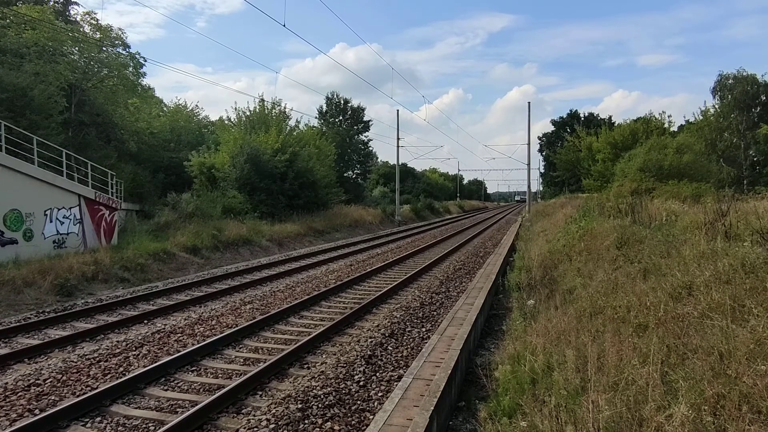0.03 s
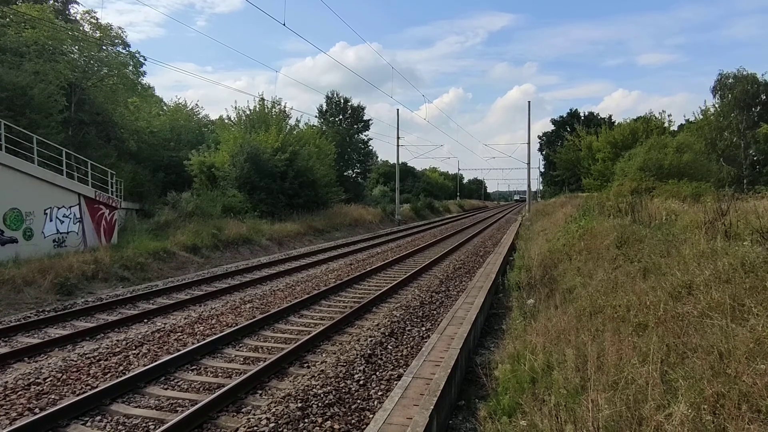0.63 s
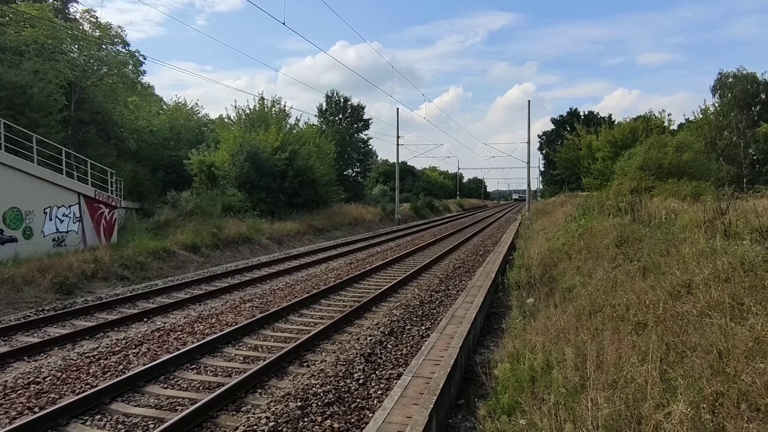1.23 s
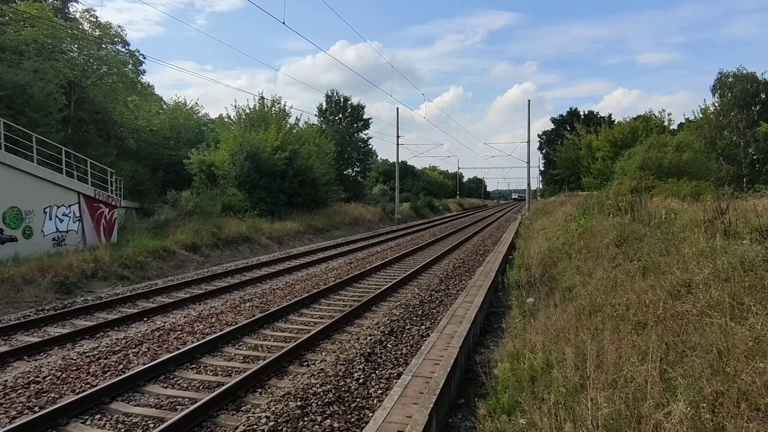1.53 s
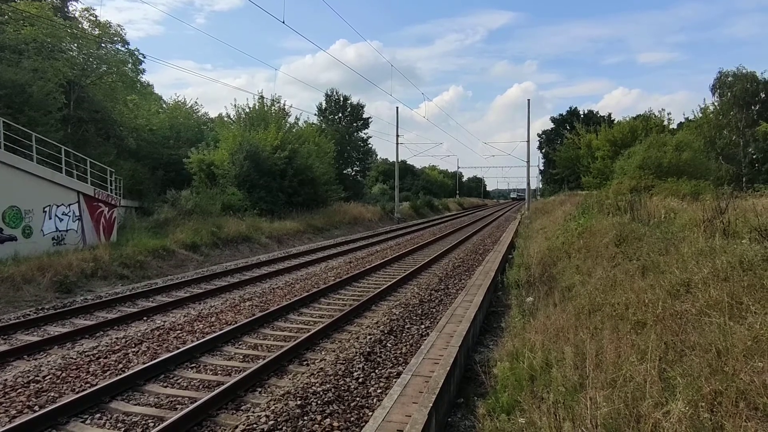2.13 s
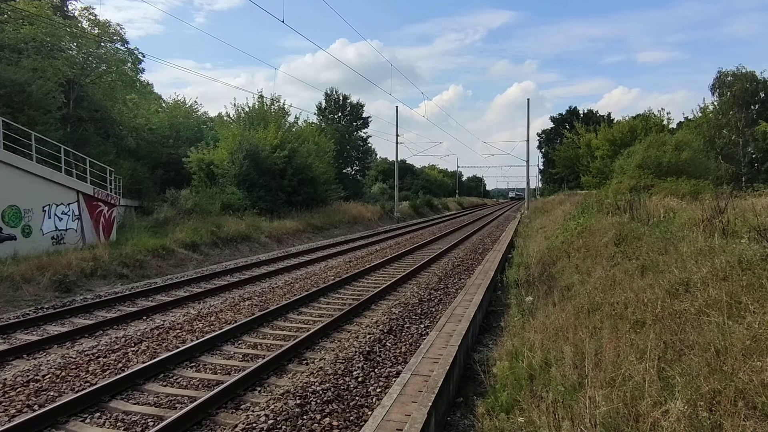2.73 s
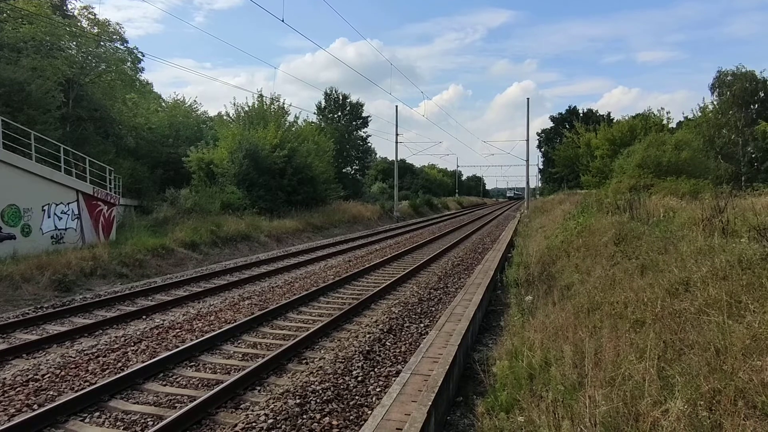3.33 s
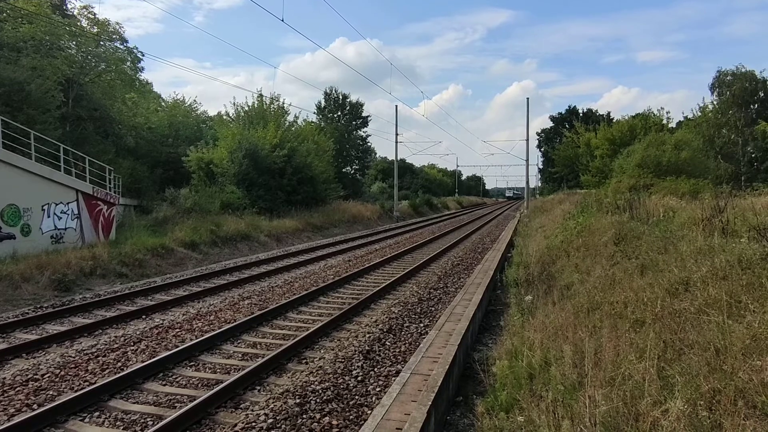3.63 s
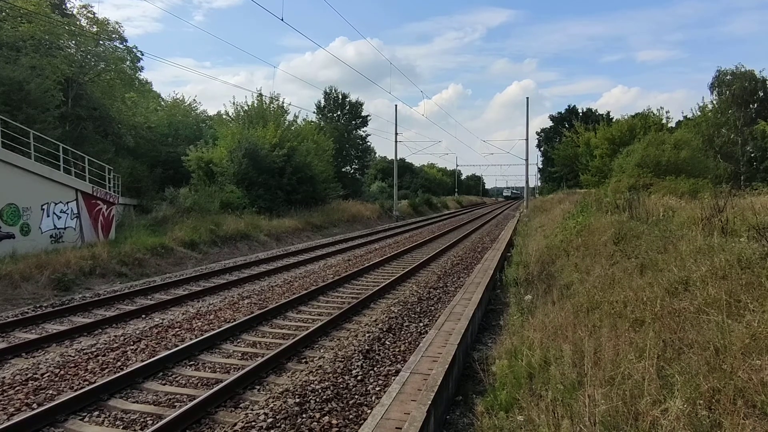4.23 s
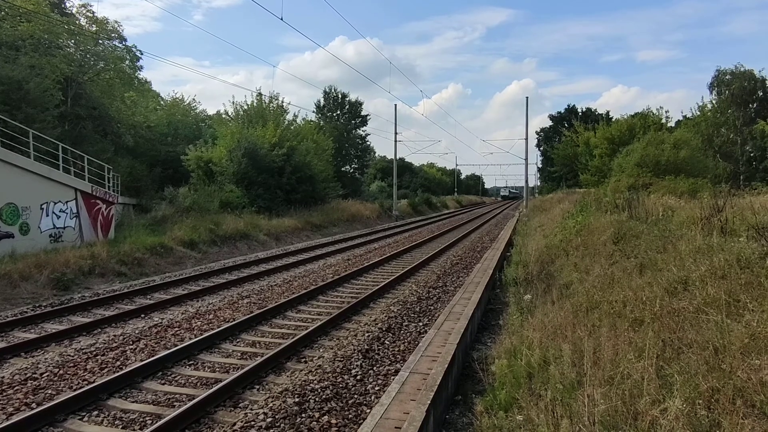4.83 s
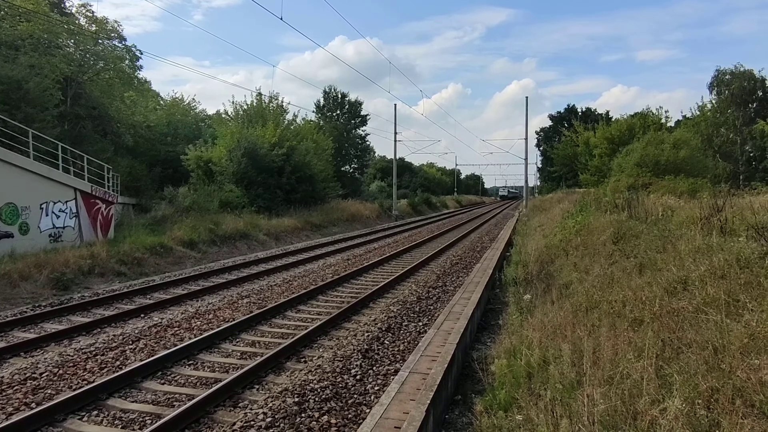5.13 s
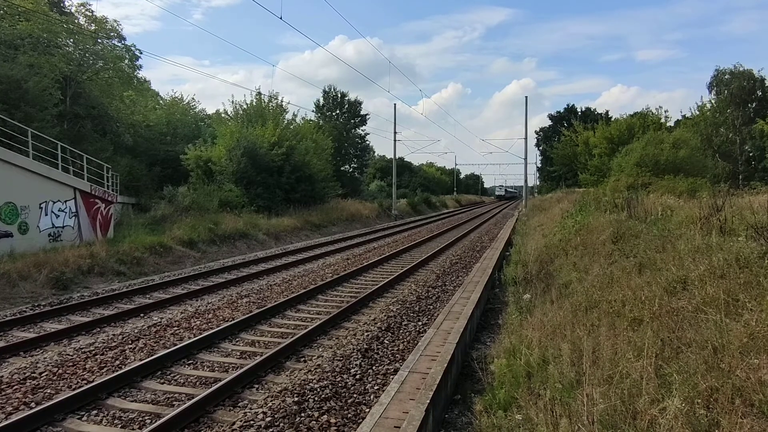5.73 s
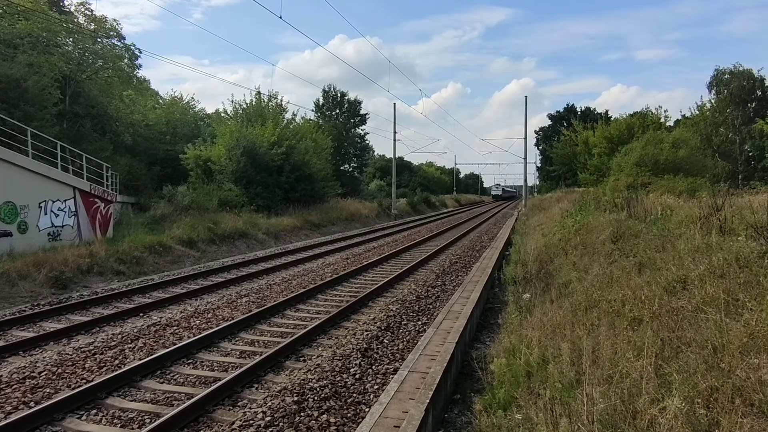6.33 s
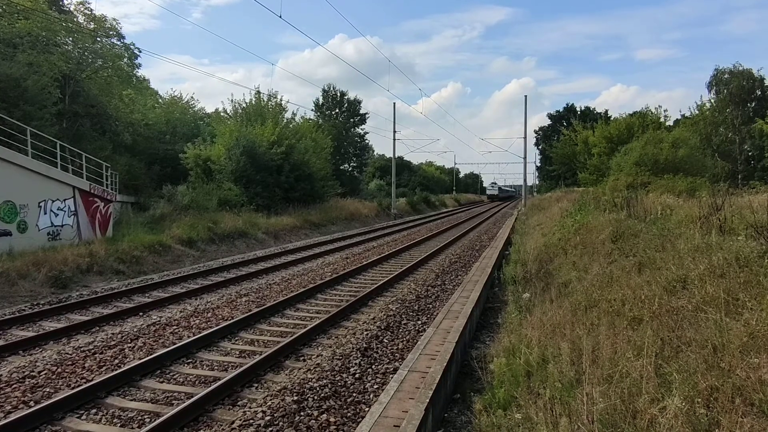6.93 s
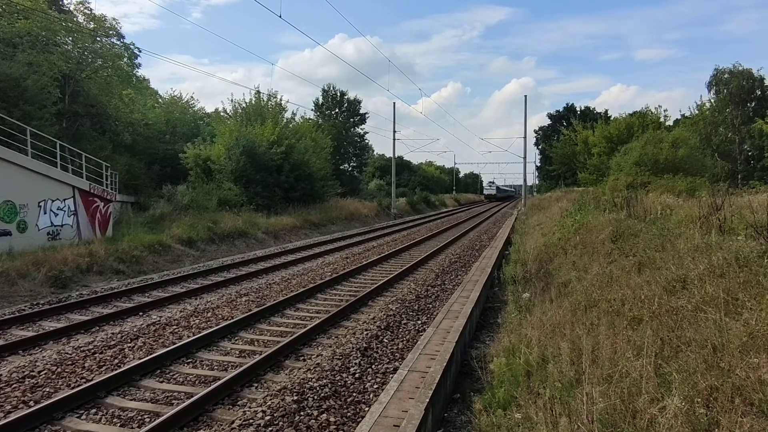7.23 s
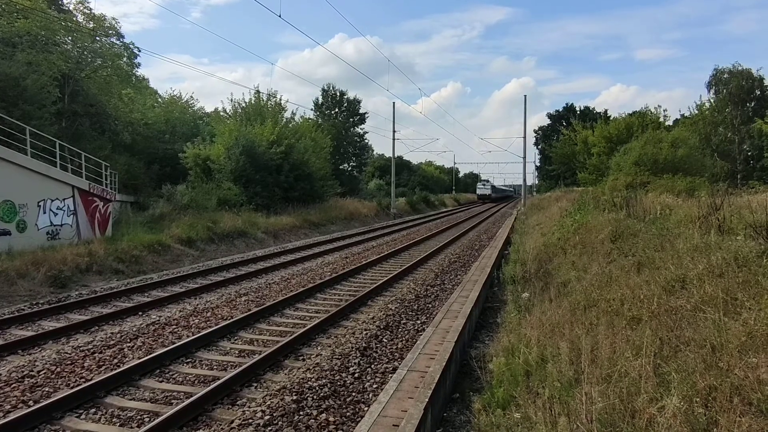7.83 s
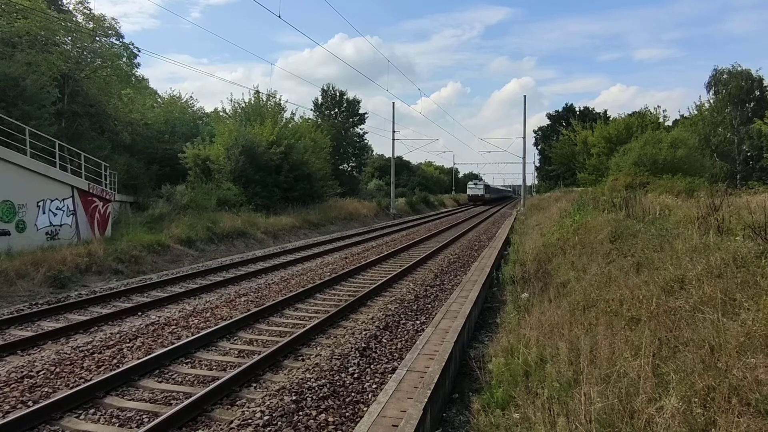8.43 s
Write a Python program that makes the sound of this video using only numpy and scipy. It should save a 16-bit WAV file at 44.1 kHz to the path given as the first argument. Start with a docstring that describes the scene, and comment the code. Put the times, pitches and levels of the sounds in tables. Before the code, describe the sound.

Steel rails sing with a ringing hiss and low rumble, growing steadily louder as a distant train approaches.

```python
"""Beside open track, a stereo microphone near the rails, a train still far off. At first the air is still,
with faint bird chirps and two rising hums. The rails carry the rolling noise ahead of the train: rough
wheel treads repeat at every turn and set the steel singing in many bands, while flat spots knock softly.
The singing eases near 2.5 s and swells near 3.5 s. Near 6 s the low drone under it blooms once,
and rails, drone and ground rumble go on growing to the end as the train draws closer."""
import sys
import numpy as np
from scipy import signal
from scipy.fft import rfft, irfft
from scipy.io import wavfile
from scipy.ndimage import uniform_filter1d, map_coordinates

SR = 44100
rng = np.random.default_rng(int(sys.argv[2]) if len(sys.argv) > 2 else 0)


def waveform_to_disk(signal):
    """Save audio, clipped to [-1, 1], as 16-bit WAV at the path in sys.argv[1]."""
    frames = np.transpose(np.atleast_2d(signal))
    scaled = np.clip(frames, -1, 1) * 32767
    samples = np.round(scaled).astype(np.int16)
    wavfile.write(sys.argv[1], SR, samples)


N = 374850
TIME = np.arange(N) / SR
FRAME, OVERLAP = 4096, 3072  # samples


# Bands in which the rails sing. Each row: centre in Hz, nominal width in Hz, base level in dB per Hz,
# dB gained per dB of approach, left over right in dB, left lead in radians, left-right likeness 0-1.
RAIL_BANDS = [(260, 147, -78, 2.5, 0, -1.6, 1), (390.6, 88, -62.5, 1.73, -3.5, 0, 0.91),
              (438, 82, -61, 1.5, -10.5, 1.0, 1.0), (475, 31, -64.5, 0.9, 10.5, 0.5, 0.95),
              (590.7, 89, -57, 1.2, 6, 1.13, 0.4), (658.8, 84, -51.5, 0.86, 0.5, 0.5, 1),
              (722, 53.4, -46.5, 1.0, 0, 0.6, 0.97), (768, 45, -50.5, 0.9, -4.5, 0.4, 0.95),
              (868, 140, -57, 0.7, -2.5, 1.63, 1), (972, 200, -59, 0.66, -7, 0.84, 0.95),
              (1098, 86, -67.5, 0.7, -15.5, -3.5, 0.8), (1190, 32, -65, 0.9, -9.5, 4, 0.2),
              (1256.5, 99, -60, 0.63, -4.5, -2.5, 0.95), (1309.3, 69, -62.5, 0.61, 6, -3, 0.34),
              (1635, 304, -72.5, 0.8, -1.7, 3, 0.35), (1850, 275, -68, 1.48, -7, -0.74, 0.49),
              (2182, 510, -72, 2.5, -0.5, -1.2, 0.4), (2330, 500, -82.5, 0.56, -2.5, 0.7, 0.08),
              (2834, 510, -83.5, 2, 0, -1.6, 0.7), (3490, 1700, -91.5, 1.9, -1.5, -2.5, 0.28),
              (4610, 2500, -99.5, 1.57, -17, 0.5, 0.4), (5510, 130, -88.5, 1.7, -9, 2.9, 0.6),
              (5634, 220, -87.5, 1.5, -10, 2, 0.55), (6410, 500, -90.5, 2, -3.5, 0.1, 0.6),
              (6748, 350, -83.5, 0.9, 12, 1.3, 0.56), (7400, 4500, -106.1, 3, 21, -3, 0.09),
              (9300, 390, -105, 1.5, 9, -3.5, 0.3), (9500, 1900, -103.3, 0.9, 9, -2.5, 0.19),
              (12440, 2800, -102.8, 0.8, -6, -3.5, 0.2), (12500, 900, -106, 0.5, -6, -3, 0.2),
              (14084, 720, -108.9, 1.5, -7, -4, 0.27)]

def rails(turns, swell_db, trim_db=-.5):
    """The contact force rings the rail bands, each growing at its own pace as the train nears."""
    hz, t, first = contact(turns)
    _, _, second = contact(turns)
    centre, width, db, growth, balance_db, lead, same = np.transpose(RAIL_BANDS)
    shape = (1 + (2 * (hz - centre) / width) ** 2) ** -2.5
    follow = 1 / (1 + (centre / 1300) ** 2)  # the low bands follow the swells most
    band_swell_db = np.outer(follow, np.interp(t, TIME, swell_db))
    power = from_db(db[:, None] + trim_db + np.outer(growth, approach(t)) + band_swell_db) ** 2
    left = (shape * from_db(balance_db)) @ power
    right = (shape / from_db(balance_db)) @ power
    likeness = (shape * same * np.exp(1j * lead)) @ power / np.sqrt(left * right)
    return sound(np.sqrt([left, right]) * pair(first, second, likeness) * sleeper_ripple(hz))


# The repeating part of the rolling noise. Each row: frequency in Hz, the treads' share of the power 0-1.
TREAD_SHARE = [(100, 0.3), (430, 0.93), (720, 0.77), (950, 0.55), (1250, 0.34), (1900, 0.13), (7000, 0)]

def contact(turns):
    """Force between wheel and rail: repeating tread roughness plus ever new rail roughness."""
    hz, t, wheel = spectra(treads(turns))
    _, _, rail = spectra(rng.standard_normal(N))
    share = by_hz(TREAD_SHARE, hz)
    return hz, t, np.sqrt(share) * wheel + np.sqrt(1 - share) * rail


def treads(turns, memory=.847, points=6400):
    """Roughness around the wheels: each turn reads nearly the same profile as the turn before."""
    fresh = rng.standard_normal((int(turns[-1]) + 2, points))
    start = memory * rng.standard_normal((1, points))
    profile, _ = signal.lfilter([np.sqrt(1 - memory ** 2)], [1, -memory], fresh, axis=0, zi=start)
    return map_coordinates(profile.ravel(), [turns * points], order=3)


def sleeper_ripple(hz, depth_db=2.1, bins=5):
    """Standing waves between the sleepers cut a fixed fine pattern into the treble."""
    pattern = uniform_filter1d(rng.standard_normal(hz.shape), bins, axis=0) * np.sqrt(bins)
    return from_db(depth_db * pattern * hz / (hz + 900))


def approach(t, db_per_s=2.08, near_s=7.97):
    """Rails lose a fixed number of dB per metre, so a nearing train climbs steadily: 0 dB at near_s."""
    return db_per_s * (t - near_s)


# Stretches of rail up the line. Each row: middle in seconds, half length in seconds, level change in dB.
STRETCHES = [(2.45, 0.37, -1.8), (3.45, 0.59, 1.3), (5.85, 0.21, -0.8)]

def rail_swells():
    """The rolling noise swells and eases, in dB, as over rougher and smoother rail."""
    return sum(db * hump(middle_s, half_s) for middle_s, half_s, db in STRETCHES)


# Waves worn into the treads. Each row: waves per turn (rounded when played), base level in dB,
# dB gained per dB of approach, left lead in radians.
TREAD_WAVES = [(61, -49.5, 0.96, .6), (85.8, -46.5, 0.5, 0.66), (94.3, -42, 1.8, .5),
               (103.06, -30, 2.5, 0.42), (109.9, -39.5, 1.8, 0.78), (124, -46, 1.1, 1),
               (167.8, -53.5, 0.5, 2.45)]

def tread_whine(turns):
    """Waves in the treads give wavering tones at whole multiples of the wheel speed."""
    near_db, out = approach(TIME), np.zeros((2, N))
    for waves, db, growth, lead in TREAD_WAVES:
        phase = 2 * np.pi * round(waves) * turns + 0.33 * wander(rate_hz=0.93)
        level_db = db + growth * near_db + 0.81 * wander(rate_hz=1.9)
        out += np.sqrt(2) * from_db(level_db) * np.sin([phase + lead, phase])
    return out


# Flat spots on single wheels. Each row: wheel speed as a factor, place in the turn 0-1.
FLAT_SPOTS = [(1.0104, .78), (1.0035, .5), (1.0035, .62), (.9985, .1)]
# Their rings at the microphone. Each row: pitch in Hz, half length in seconds, base level in dB,
# dB gained per dB of approach, left over right in dB, left lead in radians.
FLAT_SPOT_RINGS = [(427.4, 0.0078, -34.5, 1.36, -7, 1.05), (741, 0.006, -24, 1.15, -2, .6),
                   (703, 0.0058, -27, 1.0, -0.5, 0.65), (983, 0.0045, -36, 0.5, -4.5, 1.2)]

def knocks(turns, speed, swell_db, uneven_db=1.2):
    """Each flat spot strikes once a turn; the long way through the rail smears it into a soft ring."""
    near_db, out = approach(TIME), np.zeros((2, N))
    for (factor, place), (hz, half_s, db, growth, balance_db, lead) in zip(FLAT_SPOTS, FLAT_SPOT_RINGS):
        own_turns = turns * factor - place
        blow = np.round(own_turns).astype(int)
        since = (own_turns - blow) / speed  # seconds from the nearest blow
        strength, drift = rng.standard_normal((blow[-1] + 3, 2))[blow + 1].T
        level_db = db + growth * near_db + swell_db + uneven_db * strength
        ring = from_db(level_db) * np.exp(-(since / half_s) ** 2)
        phase = 2 * np.pi * (hz * since + rng.random()) + 0.35 * drift
        sides = from_db([[balance_db / 2], [-balance_db / 2]])
        out += np.sqrt(2) * ring * np.sin([phase + lead, phase]) * sides
    return out


def drone(turns, cycles_per_turn=7, base_db=-48.5, growth=.77, throb_db=1, waver_db=2):
    """A deep note locked to the wheels, near centre: it throbs, grows as they near and blooms once."""
    phase = 2 * np.pi * cycles_per_turn * turns + .3 * wander(rate_hz=3.0)
    bloom_db = 7 * hump(middle_s=5.85, half_s=.73)
    unsteady_db = throb_db * np.sin(2 * np.pi * turns) + waver_db * wander(rate_hz=4.4)
    level_db = base_db + growth * approach(TIME) + bloom_db + unsteady_db
    return np.sqrt(2) * from_db(level_db) * np.sin(phase) * from_db([[-.45], [.45]])


# The ground beside the track with the train near. Each row: frequency in Hz, level in dB per Hz.
RUMBLE = [(10, -79), (30, -70.5), (45, -64.5), (60, -65.5), (78, -72), (92, -87), (125, -95.5),
          (170, -89.5), (300, -110)]

def ground_rumble(growth=1.45):
    """Low noise from the ground, growing with the approach."""
    hz, t, noise = spectra(rng.standard_normal((2, N)))
    return sound(pair(*noise, same=.95) * from_db(by_hz(RUMBLE, hz) + growth * approach(t)))


# Faint birds, then hums as of a far motor.
# Each row: start in seconds, length in seconds, first pitch in Hz, last pitch in Hz, top level in dB.
BIRD_CHIRPS = [(.28, .065, 4750, 5150, -81), (.41, .05, 3550, 3950, -78), (.495, .05, 3550, 3950, -80),
               (3.19, .06, 4700, 5300, -76)]
FAR_HUMS = [(.7, 1.5, 112.8, 151, -68), (1.7, 1.09, 114, 134.3, -72)]

def glides(rows):
    """Chirps or hums in the background: soft tones that fade in and out while sliding up."""
    out = np.zeros(N)
    for start_s, length_s, start_hz, end_hz, db in rows:
        progress = np.clip((TIME - start_s) / length_s, 0, 1)
        phase = 2 * np.pi * np.cumsum(start_hz + (end_hz - start_hz) * progress) / SR
        out += np.sqrt(2) * from_db(db) * np.sin(np.pi * progress) * np.sin(phase)
    return out


# Still air and microphone hiss. Each row: frequency in Hz, level in dB per Hz.
AIR = [(5, -71.5), (14, -70), (30, -76), (58, -76.5), (80, -85), (100, -87), (170, -89), (300, -88.5),
       (1400, -90), (3000, -107), (6000, -113), (10000, -116), (12500, -110), (15400, -117)]
# The air's stereo image. Each row: frequency in Hz, left-right likeness 0-1.
AIR_LIKENESS = [(60, 0.53), (120, 0.6), (300, 0.8), (1000, 0.19)]

def air():
    """Steady open air around the microphone, fairly narrow in the bass and wide above."""
    hz, _, noise = spectra(rng.standard_normal((2, N)))
    return sound(pair(*noise, same=by_hz(AIR_LIKENESS, hz)) * from_db(by_hz(AIR, hz)))


def from_db(db):
    """Decibels to amplitude."""
    return 10 ** (np.asarray(db) / 20)


def by_hz(rows, hz):
    """Reads rows of (Hz, value) on a log-frequency axis."""
    row_hz, value = np.transpose(rows)
    return np.interp(np.log(hz + 1), np.log(row_hz), value)


def spectra(x):
    """Short-time spectra: Hz as a column, seconds as a row, and bins x frames."""
    hz, t, z = signal.stft(x, SR, nperseg=FRAME, noverlap=OVERLAP)
    return hz[:, None], t, z


def sound(z):
    """Short-time spectra of unit noise, scaled per Hz, back to samples."""
    _, samples = signal.istft(z, SR, nperseg=FRAME, noverlap=OVERLAP)
    return np.sqrt(SR / 2) * samples[..., :N]


def pair(a, b, same):
    """Left and right from two unrelated signals, with a given (complex) likeness."""
    apart = np.sqrt(np.maximum(1 - abs(same) ** 2, 0))
    return np.array([a, np.conj(same) * a + apart * b])


def wander(rate_hz):
    """Slow random motion of unit size."""
    lowpass = np.exp(-(np.fft.rfftfreq(N, 1 / SR) / rate_hz) ** 2)
    slow = irfft(rfft(rng.standard_normal(N)) * lowpass, N)
    return slow / slow.std()


def hump(middle_s, half_s):
    """A smooth rise to 1 and back."""
    return np.exp(-((TIME - middle_s) / half_s) ** 2)


# The train's nearly steady pace. Each row: time in seconds, wheel speed in turns per second.
WHEEL_SPEED = [(0, 7.06), (3.5, 7.035), (8.5, 7.0)]

def scene():
    """From the trackside: the same wheels drive rails, knocks, whine and drone; birds and hums behind."""
    speed = np.interp(TIME, *np.transpose(WHEEL_SPEED))
    turns = np.cumsum(speed) / SR
    swell_db = rail_swells()
    rolling = rails(turns, swell_db) + knocks(turns, speed, swell_db) + tread_whine(turns)
    train = rolling + drone(turns) + ground_rumble()
    return train + glides(BIRD_CHIRPS) + glides(FAR_HUMS) + air()


def record(dry, cutoff_hz=15720):
    """The recorder cuts the highest treble from both channels."""
    lowpass = signal.firwin(1023, cutoff_hz, window=("kaiser", 9), fs=SR)
    return signal.oaconvolve(dry, lowpass[None], "same")


dry = scene()
out = record(dry)
waveform_to_disk(out)
```